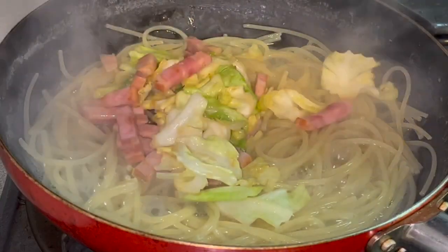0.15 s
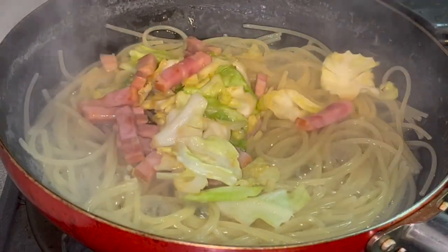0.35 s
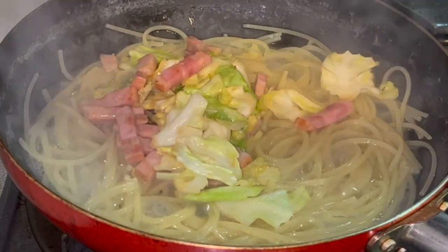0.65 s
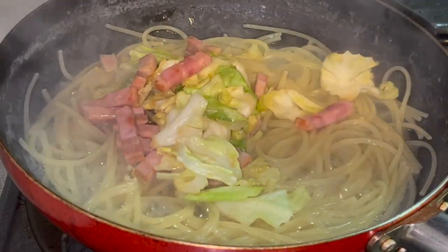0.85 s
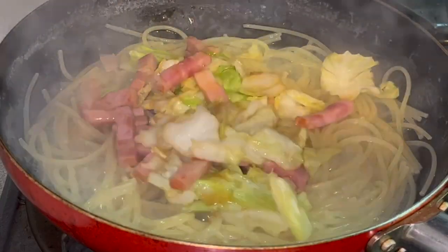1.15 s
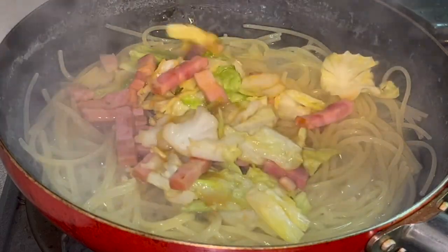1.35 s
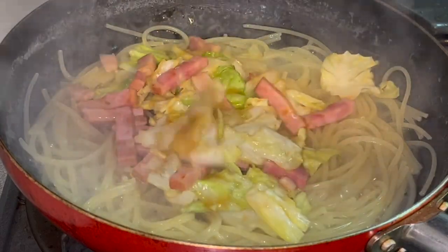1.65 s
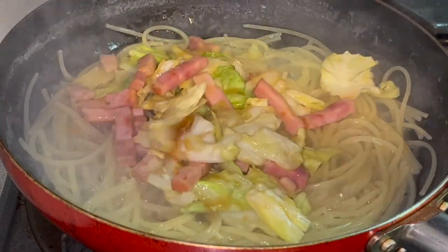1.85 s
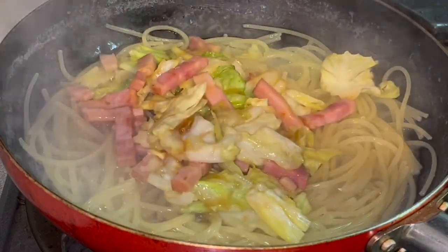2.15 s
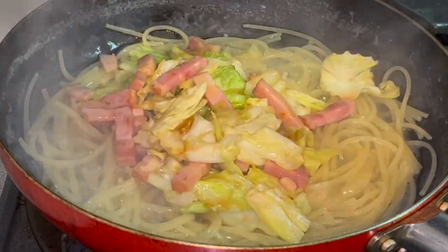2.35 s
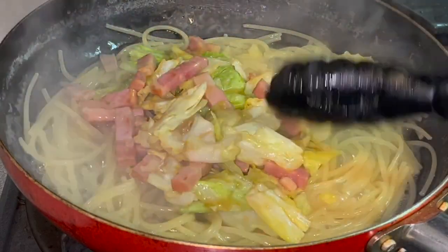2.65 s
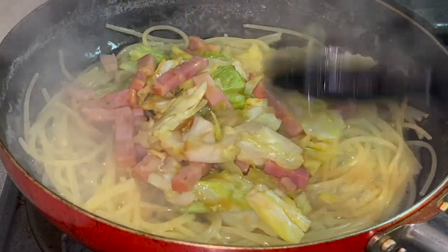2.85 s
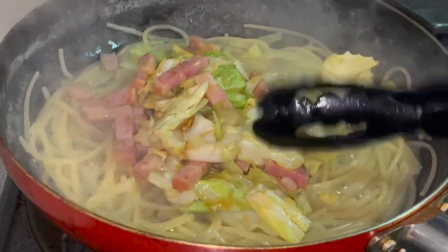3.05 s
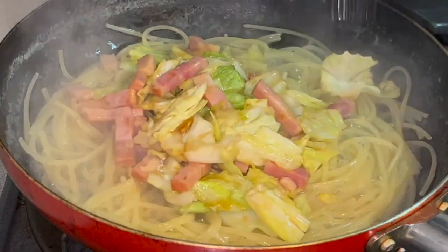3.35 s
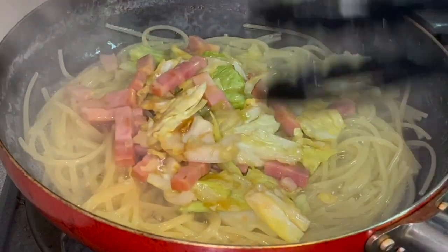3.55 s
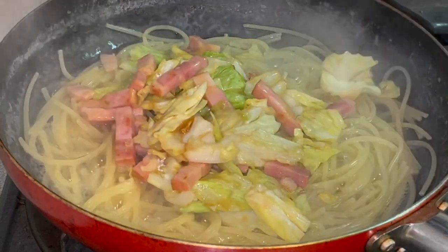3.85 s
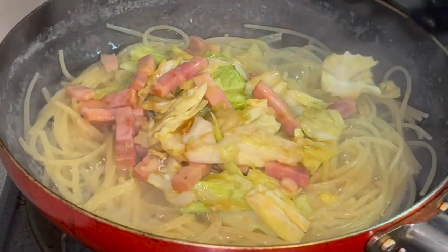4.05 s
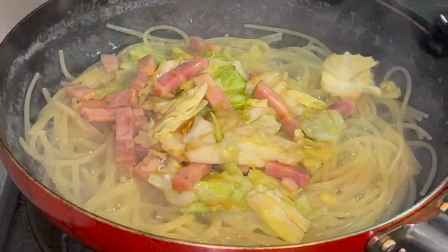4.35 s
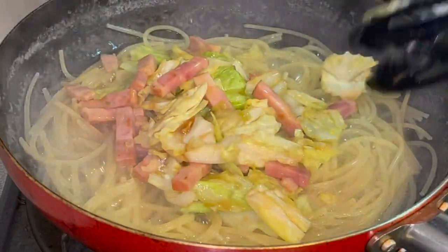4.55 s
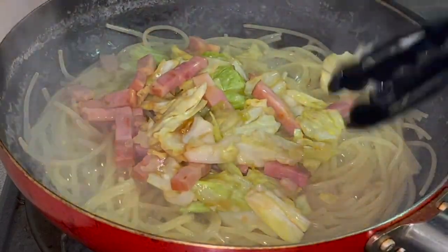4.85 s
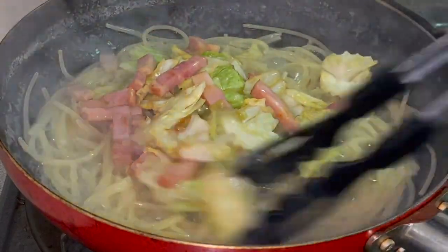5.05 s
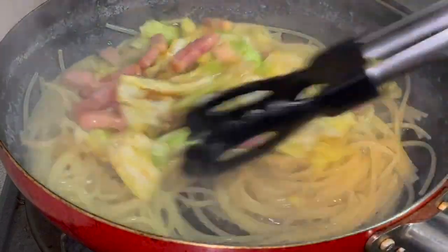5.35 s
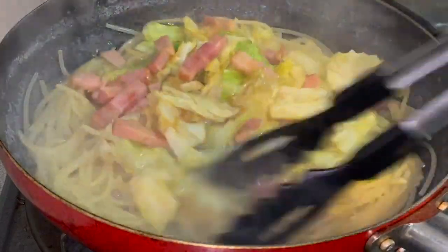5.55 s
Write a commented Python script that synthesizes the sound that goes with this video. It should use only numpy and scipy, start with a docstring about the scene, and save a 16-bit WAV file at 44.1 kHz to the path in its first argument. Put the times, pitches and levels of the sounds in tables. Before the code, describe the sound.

Under a steady fan hum, food sizzles and bubbles while tongs tap, the pan is struck loudly several times, and a utensil bounces down.

```python
"""A small kitchen: an extractor fan hums while pasta simmers and fries in a pan on a gas stove.
From 0.3 s tongs click lightly in short noise bursts and partials; at 1.0 s wet food lands and spits.
From 2.6 to 3.4 s metal knocks hard: the pan's modes ring, the stove thuds, booms and rumbles, the room answers.
Near 4.1 s a utensil is put down and bounces, then large bubbles plop as rising sines.
After two last faint clicks, the tongs stir the noodles at 5.3 s and the frying ticks grow louder."""
import sys
import numpy as np
from scipy import signal
from scipy.fft import rfft, irfft, next_fast_len
from scipy.io import wavfile
from scipy.ndimage import map_coordinates

SR = 44100
rng = np.random.default_rng(int(sys.argv[2]) if len(sys.argv) > 2 else 0)


def persist_wave(psi):
    """Save psi, clipped to +-1, as 16-bit WAV."""
    counts = np.round(np.clip(psi, -1, 1) * 32767).astype(np.int16)
    wavfile.write(sys.argv[1], SR, np.atleast_2d(counts).T)


N = 252252
RING_T = np.arange(SR) / SR  # the second after a contact


def amp(db):
    """Decibels to gain."""
    return 10 ** (np.asarray(db) / 20)


def unit(x):
    """Scale to rms 1."""
    return x / np.sqrt(np.mean(x ** 2) + 1e-20)


def along(points, hz):
    """Read (freq_hz, value) points on a log frequency axis."""
    f, v = np.transpose(points)
    return np.interp(np.log(hz + 1), np.log(f + 1), v)


def curve(rows):
    """Read (time_s, value) rows at every sample."""
    return np.interp(np.arange(N) / SR, *np.transpose(rows))


def wobble(rate):
    """A smooth random curve, rate knots a second."""
    knots = rng.standard_normal(int(N * rate / SR) + 4)
    return map_coordinates(knots, [np.arange(N) * rate / SR])


def swell(s, half_s):
    """A smooth bump of height 1 around time s."""
    return np.exp(-((np.arange(N) / SR - s) / half_s) ** 2)


def filtered(x, response):
    """x times a response of frequency."""
    n = x.shape[-1]
    m = next_fast_len(n + SR // 4)  # padded so that the filter's tail does not wrap round
    return irfft(rfft(x, m) * response(np.fft.rfftfreq(m, 1 / SR)), m)[..., :n]


def noise(response, size):
    """Two unrelated coloured noises, mid and side, of rms 1 together."""
    return unit(filtered(rng.standard_normal((2, size)), response))


def band_noise(centre_hz, half_width_hz, size=SR):
    """Noise around one broad resonance."""
    return noise(lambda hz: 1 / (1 + ((hz - centre_hz) / half_width_hz) ** 2), size)


def fade(t60, attack):
    """A quick rise, then a fall of 60 dB in t60."""
    return amp(-60 * RING_T / t60) * (1 - np.exp(-RING_T / attack))


def partial(hz, rough):
    """A sine whose phase drifts, so that it rings as a narrow band; mid and side differ."""
    drift = np.cumsum(rng.standard_normal((2, SR)), axis=1) * rough * np.sqrt(hz / SR)
    return np.sin(2 * np.pi * (hz * RING_T + drift + rng.random((2, 1))))


def ringing(modes, rough, scatter_db):
    """Modes (pitch_hz, level_db, t60_s) struck together, their strengths varying from blow to blow."""
    return sum(amp(db + rng.normal(0, scatter_db)) * partial(hz, rough) * fade(t60, attack=0.00089)
               for hz, db, t60 in modes)


def add(track, s, sound):
    """Mix a sound into the track at time s."""
    part = track[:, round(s * SR):][:, :sound.shape[1]]
    part += sound[:, :part.shape[1]]


# turn-rate harmonics of the fan: multiple, relative level_db
FAN_HARMONICS = [(2, -8), (3, -5), (4, -13), (5, -0.5), (6, -5), (7, -23), (8, -12), (11, -15), (14, -12.5),
                 (18, -11), (21, -13)]
# colour of its rushing air: freq_hz, gain_db
AIR_COLOUR = [(200, 2), (300, -1), (360, -5.5), (470, 4.5), (570, -5), (800, -3), (970, -14), (1200, -9.5),
              (1580, -14.5), (1900, -9), (2400, -17), (4000, -22), (7000, -29.5), (12000, -29),
              (14000, -35), (16000, -62)]
FAN_HZ = 23.39  # mean turns of the fan a second


def fan():
    """The extractor hums on multiples of its slightly unsteady turn rate, rushes with air and whistles."""
    turns = np.cumsum(FAN_HZ * (1 + 0.00417 * wobble(3))) / SR
    hum = sum(amp(db + 3.6 * wobble(5.05)) * np.sin(2 * np.pi * (round(k) * turns + rng.random()))
              for k, db in FAN_HARMONICS)
    air = noise(lambda hz: amp(along(AIR_COLOUR, hz)) * hz ** 2 / (hz ** 2 + 130 ** 2), size=N)
    air = air * amp(0.63 * wobble(3.73))
    whistle = band_noise(11550, 70, size=N)[0]
    centre = amp(-40.0) * hum + amp(-68.0) * whistle
    return np.array([centre, np.zeros(N)]) + amp(-43.5) * air


# level of the handling rumble before its trim: time_s, level_db
RUMBLE_LEVEL = [(0.0, -38), (0.83, -36.5), (1.77, -39), (2.09, -33.5), (2.64, -34.5), (2.95, -29.5),
                (4.52, -40.5), (5.72, -36.5)]
# colour of the rumble: freq_hz, gain_db
RUMBLE_COLOUR = [(20, -37), (45, -7.5), (85, 0), (150, -7), (260, -11.5), (500, -26), (1500, -88)]
RUMBLE_TRIM_DB = -2


def handling_rumble():
    """The low rumble of the stove being handled: deep noise, rising around 3 s and then falling."""
    level_db = curve(RUMBLE_LEVEL) + RUMBLE_TRIM_DB
    return amp(level_db) * noise(lambda hz: amp(along(RUMBLE_COLOUR, hz)), size=N)


# colour of the frying: freq_hz, gain_db
SIZZLE_COLOUR = [(500, -16), (2000, 2.5), (5000, -2.5), (7000, -6), (12000, 1), (14000, -5), (16000, -40)]
FRYING_DB, FRYING_DRIFT_DB = -64, -1  # base level and its slow drift
LAND_S, LAND_HALF_S, LAND_RISE_DB = 1.005, 0.037, 15.5  # wet food lands in the pan and spits
STIR_S, STIR_HALF_S, STIR_RISE_DB = 5.33, 0.13, 6  # the noodles are stirred


def frying():
    """Tiny bubbles burst all over the pan: dense uneven ticks, louder as food lands and is stirred."""
    sizes = amp(2.4 * rng.standard_normal(N))
    bursts = (rng.random(N) < 900 / SR) * rng.standard_normal((2, N)) * sizes
    level_db = FRYING_DB + FRYING_DRIFT_DB * wobble(1.8)
    level_db = level_db + LAND_RISE_DB * swell(LAND_S, LAND_HALF_S) + STIR_RISE_DB * swell(STIR_S, STIR_HALF_S)
    return amp(level_db) * unit(filtered(bursts, lambda hz: amp(along(SIZZLE_COLOUR, hz))))


def bubble(hz):
    """One bursting bubble: a short ring that rises in pitch."""
    t = RING_T[:SR // 25]
    return np.sin(2 * np.pi * hz * t * (1 + 4 * t)) * np.exp(-hz * t / 7) * (1 - np.exp(-hz * t))


# the sauce boils up: centre_s, half_length_s, rise_db
SURGES = [(0.7, 0.42, 6), (2.35, 0.92, 12), (3.62, 0.35, 12.5), (4.745, 0.055, 13), (5.45, 0.25, 5)]
# large bubbles in the centre: start_s, starting pitch_hz, level_db
PLOPS = [(4.330, 1020, -45), (4.752, 666, -38), (4.772, 835, -40), (4.864, 510, -37)]
BUBBLES_PER_S, BUBBLE_DB, BUBBLE_RANGE_DB = 90, -53, 5  # rate, base level, small to large


def simmer():
    """Sauce bubbles pop between the noodles, a few large ones among them."""
    track = np.zeros((2, N))
    boil_db = BUBBLE_DB + sum(db * swell(s, half_s) for s, half_s, db in SURGES)
    for when, pitch, size, spread in rng.random((round(BUBBLES_PER_S * N / SR), 4)):
        hz = 450 * 5 ** pitch
        # a few are loud; high ones are quieter
        level_db = boil_db[int(when * N)] + BUBBLE_RANGE_DB * size ** 2 - 7 * pitch
        add(track, when * N / SR, amp(level_db) * np.outer([1, 2 * spread - 1], bubble(hz)))
    for s, hz, level_db in PLOPS:
        add(track, s, amp(level_db) * np.outer([1, 0], bubble(hz)))
    return track


# how long the room holds each frequency: freq_hz, t60_s
KITCHEN_DECAY = [(100, 0.96), (500, 0.26), (2000, 1.15), (3300, 0.8), (5000, 0.49), (12000, 0.34)]


def in_kitchen(sound, wet_db):
    """A contact plus the room's answer, in which each frequency dies at its own speed."""
    hz, t, z = signal.stft(rng.standard_normal((2, SR)), SR, nperseg=256)
    decay = amp(-60 * t / along(KITCHEN_DECAY, hz)[:, None])
    tail = signal.istft(z * decay, SR, nperseg=256)[1][:, :SR]
    tail = tail * (1 - np.exp(-RING_T / 0.0041))  # reflections take a moment to build up
    echo = signal.fftconvolve(sound[:1], tail / np.linalg.norm(tail[0]), axes=1)[:, :SR]
    return sound + amp(wet_db) * echo


# colour of a dry snap: freq_hz, gain_db
SNAP_COLOUR = [(150, -5), (600, 2.5), (1500, -9), (3000, 3), (5500, -5), (7500, -9.5), (12000, -11.5),
               (16000, -32)]


def snap_gain(hz):
    """Spectrum of a dry, sharp first touch."""
    return amp(along(SNAP_COLOUR, hz))


# light clicks of the tongs, levels before trims: start_s, ring level_db, six partials pitch_hz
# from strong to weak, snap level_db, arms level_db, rebound delay_s
CLICKS = [(0.266, -40, 5340, 6100, 3560, 4330, 2470, 6800, -44, -65, 0.012),
          (0.367, -32.5, 565, 1080, 1430, 2130, 3050, 4100, -46.5, -54, 0.04),
          (0.630, -30.5, 2910, 920, 5240, 554, 2600, 5650, -28.5, -49, 0.008),
          (1.009, -40.5, 3900, 4180, 5600, 3700, 6300, 9900, -45, -62, 0.0099),
          (1.076, -19.5, 654, 880, 1970, 730, 4350, 2570, -38, -54, 0.0027),
          (1.170, -27, 2595, 1995, 900, 590, 2930, 4600, -36.5, -42.5, 0.024),
          (1.469, -20, 2600, 1746, 3150, 2930, 4620, 3930, -34, -37, 0.072),
          (1.778, -20.5, 3150, 2610, 1350, 3900, 1100, 5760, -25, -36.5, 0.045),
          (2.730, -19.5, 3910, 4360, 3165, 2260, 1020, 1660, -29.5, -39, 0.0073),
          (5.129, -32.5, 1104, 1320, 930, 1180, 720, 1740, -52, -64, 0.01),
          (5.298, -49, 5500, 5900, 4600, 5200, 6300, 4000, -59, -70, 0.011)]
# modes of the arms of the tongs: pitch_hz, relative level_db, t60_s
TONGS_MODES = [(918, -4, 0.077), (1713, -6, 0.22), (2010, -3, .12), (1360, -11, .09), (2540, 3, 0.19),
               (2910, 1, 0.16), (3170, -6, 0.22), (3330, -2, 0.32), (3460, -2, .15), (3700, -1, 0.11),
               (4150, -9, .12), (4380, -5, .1), (4700, -4, .15)]
PARTIAL_STEP_DB = -3  # each partial re the one before
REBOUND_DB, REBOUND_HZ = -30, 5100  # level before the share of the snap's, and centre


def clicks():
    """Tongs touch metal lightly: a snap, short partials set by the contact point, ringing arms, a rebound."""
    track = np.zeros((2, N))
    for s, ring_db, *partials_hz, snap_db, arms_db, rebound_s in CLICKS:
        ring = sum(amp(PARTIAL_STEP_DB * k) * partial(hz, rough=0.045) for k, hz in enumerate(partials_hz))
        ring = ring * fade(t60=0.049, attack=0.001)
        snap = noise(snap_gain, size=SR) * fade(t60=0.04, attack=0.00054)
        rattle = band_noise(4300, 1500) * fade(t60=0.14, attack=0.0022)
        clack = amp(snap_db + 4.5) * (snap + amp(-11.5) * rattle)
        arms = amp(arms_db) * ringing(TONGS_MODES, rough=0.055, scatter_db=1.5)
        add(track, s, amp(ring_db) * ring + arms + in_kitchen(clack, wet_db=-17.0))
        # the springy arms touch again with a thin tick
        rebound = band_noise(REBOUND_HZ, 1200) * fade(t60=0.099, attack=0.0005)
        add(track, s + rebound_s, amp(REBOUND_DB + 0.43 * snap_db) * rebound)
    return track


# resonances of the stove and its grate: centre_hz, width_hz, gain_db
STOVE = [(70, 29, -1.5), (114, 82, -6.5), (227.4, 28, 2.5), (442, 73, -7), (653, 316, -12)]


def stove_response(hz):
    """The stove's resonances in parallel, every second one in opposite phase."""
    return sum((-1) ** k * amp(db) * 1j * hz * w / (c * c - hz * hz + 1j * hz * w)
               for k, (c, w, db) in enumerate(STOVE))


def thud(t60, attack):
    """A shake of the stove and its grate: noise through their resonances, scaled to peak 1."""
    shake = noise(stove_response, size=SR) * fade(t60, attack)
    return shake / np.abs(shake).max()


# colour of a hard blow: freq_hz, gain_db
BLOW_COLOUR = [(100, -52), (400, -16.5), (680, -13.5), (900, -5.5), (1200, -9), (1550, -8.5), (2200, -7.5),
               (3200, -11), (4300, -11), (6500, -16), (11500, -12.5), (14000, -20), (16000, -56)]


def blow_db(hz):
    """Spectrum of metal hitting metal hard, in dB."""
    return along(BLOW_COLOUR, hz)


# hard knocks on the pan, levels before trims: start_s, level_db, brightness_db_per_octave,
# strongest resonance_hz, clatter_db and ring_db re the knock, four favoured modes pitch_hz, thud level_db,
# chatter_db re the blow, clack pitch_hz, clack level_db, clank pitch_hz, clank level_db
KNOCKS = [(2.593, -16, -1.8, 2080, -13, -12.5, 965, 1220, 2250, 3898, -32, -19, 1005, -14.5, 5200, -26),
          (2.731, -25.5, 0.88, 3970, -24, -11, 858, 965, 3898, 4440, -38, -21, 920, -23, 3110, -32),
          (2.871, -13, 1.7, 2260, -14, -14.5, 1220, 1755, 2838, 3898, -32, -9, 897, -13.5, 5320, -23),
          (3.028, -14.5, 0.26, 2300, -14.5, -11.5, 905, 1755, 2070, 2509, -36, -6, 930, -18, 2360, -22),
          (3.402, -14, 0.86, 4630, -6, -11.5, 738, 1163, 2370, 4440, -27.5, -30, 995, -15, 4460, -18)]
CHATTER_S, CHATTER_DULL = 0.006, -4.5  # the metal strikes again: delay, change in dB per octave
CHATTER_RING_DB = -8  # it rings the pan less than the blow


def contacts():
    """Every knock is two contacts: the blow and a duller chatter right after it."""
    for (s, level_db, bright_db, accent_hz, clatter_db, ring_db, *favoured_hz,
         thud_db, chatter_db, _, _, _, _) in KNOCKS:
        yield s, level_db, bright_db, accent_hz, clatter_db, ring_db, favoured_hz, thud_db
        yield (s + CHATTER_S, level_db + chatter_db, bright_db + CHATTER_DULL, accent_hz, clatter_db,
               ring_db + CHATTER_RING_DB, favoured_hz, thud_db + chatter_db)


# modes of the pan: pitch_hz, relative level_db, t60_s
PAN_MODES = [(428, -8, .28), (738, -7, .35), (858, 3, .08), (905, -3, .28), (965, -2, .22), (1045, 3, .06),
             (1163, -4.5, .26), (1220, -2, .25), (1410, -7, .22), (1624, -8, .15), (1755, -6, .28),
             (1830, -7, .3), (1965, -7, .26), (2070, -5, .28), (2250, -5, .12), (2370, -9, .28),
             (2509, -5.5, .23), (2838, -6, .3), (3085, -8, .27), (3321, -10, .23), (3418, -10, .23),
             (3700, -12, .22), (3898, -6, .18), (4440, -8, .2), (5215, -10, .18), (5687, -9, .22),
             (5868, -11, .24)]
FAVOUR_DB = 6  # lift of the pan modes that a knock favours
RATTLE_DB, RATTLE_PER_S = 3, 199  # unevenness of the clatter: depth, rate
THUD_DELAY_S = 0.012  # the stove gives way just after the blow


def knocks():
    """Each hard blow cracks, rings the pan, clatters the loose metal and shakes the stove."""
    track = np.zeros((2, N))
    for s, level_db, bright_db, accent_hz, clatter_db, ring_db, favoured_hz, thud_db in contacts():
        # each contact has its own brightness, and its place on the pan favours one resonance
        tilt_db = lambda hz: bright_db * np.log2((hz + 100) / 2000)
        contact_db = lambda hz: tilt_db(hz) + 6 / (1 + ((hz / accent_hz - 1) / 0.077) ** 2)
        crack = noise(lambda hz: amp(blow_db(hz) + contact_db(hz)), size=SR)
        crack = crack * fade(t60=0.035, attack=0.00079)
        # first touch of metal on metal: over within a few milliseconds
        tick = noise(lambda hz: snap_gain(hz) * amp(contact_db(hz)) * hz / (hz + 3000), size=SR)
        tick = tick * fade(t60=0.008, attack=0.0012)
        # the clatter is duller than the blow itself, and uneven
        uneven = unit(amp(RATTLE_DB * wobble(RATTLE_PER_S)[:SR]))
        clatter = noise(lambda hz: amp(blow_db(hz) + tilt_db(hz)) / np.hypot(1, hz / 6000), size=SR)
        clatter = uneven * clatter * fade(t60=0.27, attack=0.00053)
        # the modes that move most at the struck spot sing out over the rest
        favoured = np.array(favoured_hz)
        favour_db = lambda hz: FAVOUR_DB * np.exp(-((hz / favoured - 1) / 0.025) ** 2).max()
        modes = [(hz, db + favour_db(hz), t60) for hz, db, t60 in PAN_MODES]
        ring = ringing(modes, rough=0.015, scatter_db=1.0)
        metal = amp(7.0) * tick + amp(4) * crack + amp(clatter_db) * clatter
        add(track, s, amp(level_db) * (in_kitchen(metal, wet_db=-12.0) + amp(ring_db - 3) * ring))
        add(track, s + THUD_DELAY_S, amp(thud_db + 14.5) * thud(t60=0.46, attack=0.0073))
    return track


CLACK_RISE_S = 0.0026  # the wall of the pan flexes: time to its widest swing
CLANK_SPREAD = 0.06  # spacing of a clank's three partials, as a share of its pitch


def clacks():
    """Each knock flexes the pan wall, a hollow clack of a few swings, and sets off a brief clank."""
    track, age = np.zeros((2, N)), RING_T / CLACK_RISE_S
    for s, *_, clack_hz, clack_db, clank_hz, clank_db in KNOCKS:
        phase = 2 * np.pi * clack_hz * RING_T
        swings = np.array([np.sin(phase), np.cos(phase)]) * (age * np.exp(1 - age)) ** 2
        clank = sum(partial(clank_hz * (1 + CLANK_SPREAD * k), rough=0.05) for k in (-1, 0, 1))
        clank = clank * fade(t60=0.037, attack=0.00078)
        add(track, s, in_kitchen(amp(clack_db) * swings + amp(clank_db) * clank, wet_db=-15.5))
    return track


BOOM_HZ, BOOM_HALF_WIDTH_HZ = 88, 45
BOOM_RISE_S, BOOM_T60_S = 0.041, 1.54


def boom():
    """The stove's body booms on in one broad, deep resonance with each knock."""
    track = np.zeros((2, N))
    for s, *_, thud_db, _, _, _, _, _ in KNOCKS:
        body = band_noise(BOOM_HZ, BOOM_HALF_WIDTH_HZ)
        add(track, s, amp(thud_db) * body * fade(BOOM_T60_S, BOOM_RISE_S))
    return track


# the rocked pan drops back on the grate: start_s, deep thump level_db, hollow thump level_db,
# grate shake level_db, clatter level_db
JOLTS = [(2.603, -36, -30, -22.5, -24), (2.640, -22.5, -28, -36, -34.5), (2.930, -20, -14.5, -16, -26.5),
         (3.066, -25, -22, -25, -42), (3.431, -22, -17, -22, -33), (3.462, -20, -17.5, -21, -32)]
# deep thump of the stove's body: pitch_hz, relative level_db, t60_s
DEEP_MODES = [(80.5, -3, .3), (121.2, -7.5, 0.27)]
# hollow thump of its grate: pitch_hz, relative level_db, t60_s
HOLLOW_MODES = [(222, -2.5, .14), (252, -7, 0.13), (428, -14, .15)]


def jolts():
    """The rocked pan drops back on the grate: a deep and a hollow thump, a shake and a little clatter."""
    track = np.zeros((2, N))
    for s, deep_db, hollow_db, shake_db, clatter_db in JOLTS:
        deep = amp(deep_db) * ringing(DEEP_MODES, rough=0.052, scatter_db=0)
        hollow = amp(hollow_db) * ringing(HOLLOW_MODES, rough=0.045, scatter_db=1)
        thump = (deep + hollow) * (1 - np.exp(-RING_T / 0.0042))  # a softened onset
        shake = band_noise(470, 190) * fade(t60=0.15, attack=0.005)
        shake = amp(shake_db) * shake / np.abs(shake).max()
        clatter = noise(lambda hz: amp(blow_db(hz)), size=SR) * fade(t60=0.11, attack=0.0029)
        add(track, s, thump + shake + amp(clatter_db) * clatter)
    return track


# a utensil is put down and bounces, levels before trims: start_s, ring level_db, snap level_db,
# thud level_db, woody knock level_db
CLUNKS = [(4.054, -26, -24, -24, -35), (4.072, -33.5, -35, -27.5, -38), (4.104, -31, -34, -31, -39),
          (4.219, -39.5, -38.5, -32.5, -32.5)]
# modes of the utensil: pitch_hz, relative level_db, t60_s
UTENSIL_MODES = [(468, -6, .15), (577, -12, .12), (749, -0.5, 0.24), (1089, 1, 0.13), (1204, -2, 0.21),
                 (1370, -1.5, .08), (1790, -1, 0.1), (1880, -2.5, 0.1), (2220, 3, 0.085),
                 (2320, -2.5, 0.11), (2800, -11, 0.18), (2910, -5, 0.15), (3230, -16, .1), (3930, -16, .1),
                 (4590, -12, .11)]


def clunks():
    """A utensil bounces beside the pan: a dry snap, a few hollow modes, a woody knock, a thud."""
    track = np.zeros((2, N))
    for s, ring_db, snap_db, thud_db, wood_db in CLUNKS:
        ring = amp(ring_db - 4) * ringing(UTENSIL_MODES, rough=0.034, scatter_db=0.0)
        snap = amp(snap_db) * noise(snap_gain, size=SR) * fade(t60=0.042, attack=0.00026)
        wood = amp(wood_db) * band_noise(520, 110) * fade(t60=0.12, attack=0.0036)
        shake = amp(thud_db + 4) * thud(t60=0.226, attack=0.0069)
        add(track, s, ring + wood + in_kitchen(snap, wet_db=-12.5) + shake)
    return track


# stereo width by frequency: freq_hz, side gain_db
WIDTH = [(60, -28), (200, -20), (380, -5.5), (700, -6), (1300, 2.5), (2400, -12.5), (4400, -35), (6500, -1),
         (9500, -4), (11800, -28), (14500, 1)]
# stereo lean: freq_hz, left minus right in level_db
LEAN = [(60, -1), (380, -1.5), (1300, -4.5), (2400, -0.5), (4400, 0)]


def scene():
    """All sources as mid and side, spread by frequency to left and right, leaning right below the treble."""
    both = fan() + handling_rumble() + frying() + simmer() + clicks()
    both = both + knocks() + clacks() + boom() + jolts() + clunks()
    mid, side = both[0], filtered(both[1], lambda hz: amp(along(WIDTH, hz)))
    pair = np.array([mid + side, mid - side])
    return filtered(pair, lambda hz: amp(np.outer([.5, -.5], along(LEAN, hz))))


# where the microphone's two ports cancel in the middle: freq_hz, gain_db
MICROPHONE = [(6000, 0), (7500, -5), (8400, -30), (9300, -8.5), (11000, -7)]
TOP_HZ = 16000  # band limit


def record(dry):
    """The microphone pair notches the centre's treble; a safety limit and a band limit follow."""
    mid = dry.mean(axis=0)
    heard = dry - mid + filtered(mid, lambda hz: amp(along(MICROPHONE, hz)))
    # a safety limit keeps the highest peaks from overloading
    limited = heard / (1 + np.abs(heard / .92) ** 8) ** (1 / 8)
    return filtered(limited, lambda hz: hz < TOP_HZ)


dry = scene()
out = record(dry)
persist_wave(out)
```